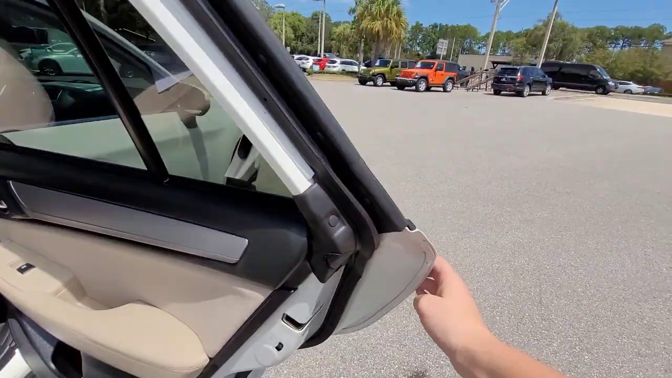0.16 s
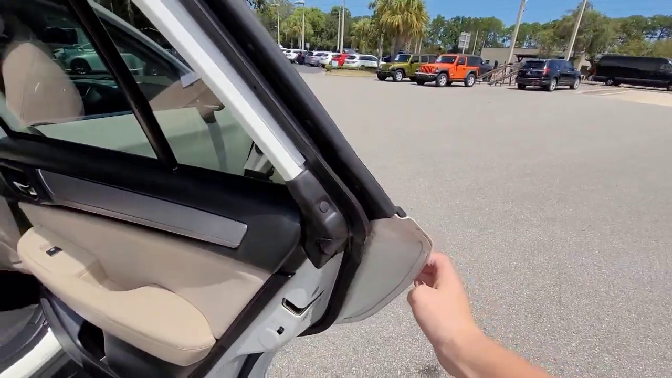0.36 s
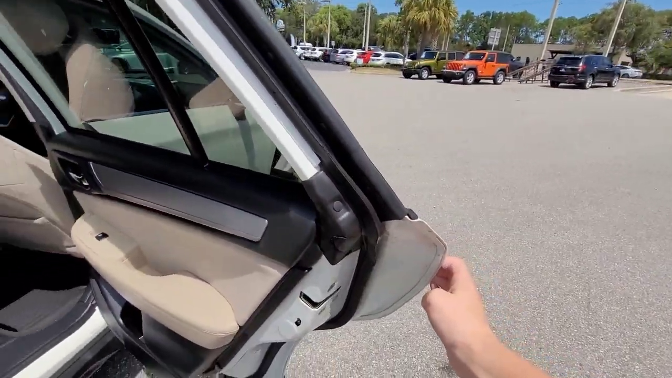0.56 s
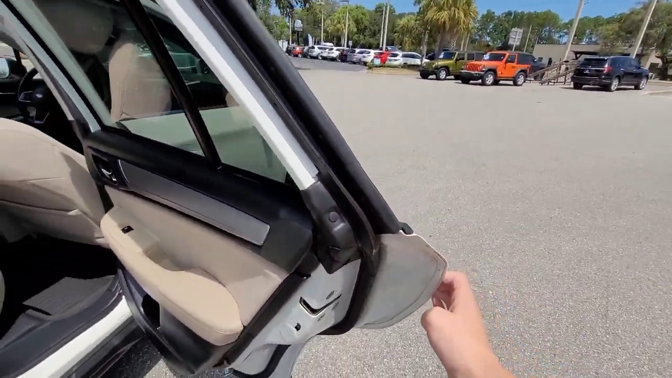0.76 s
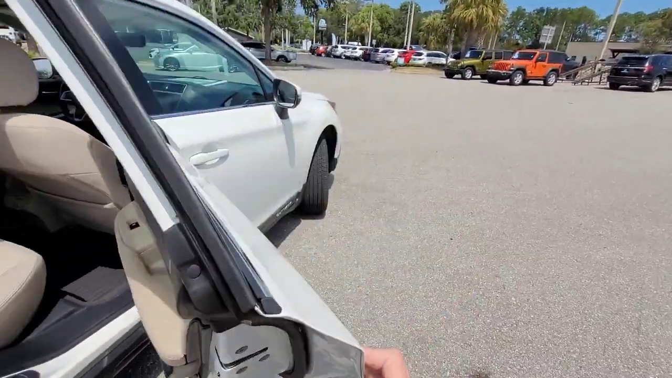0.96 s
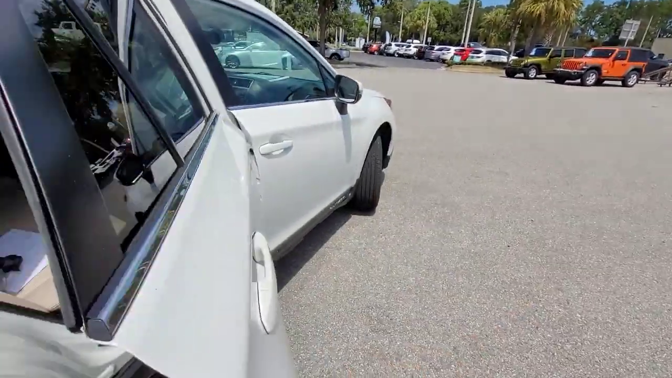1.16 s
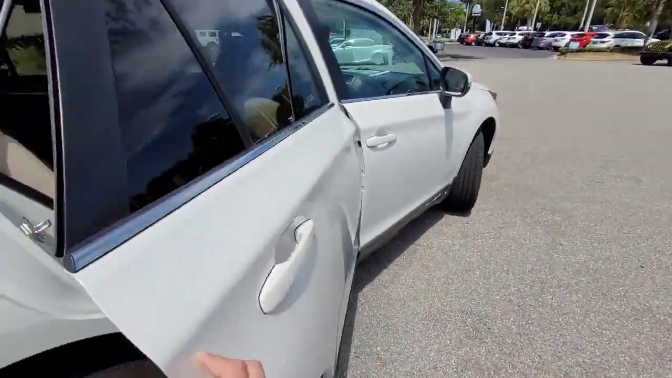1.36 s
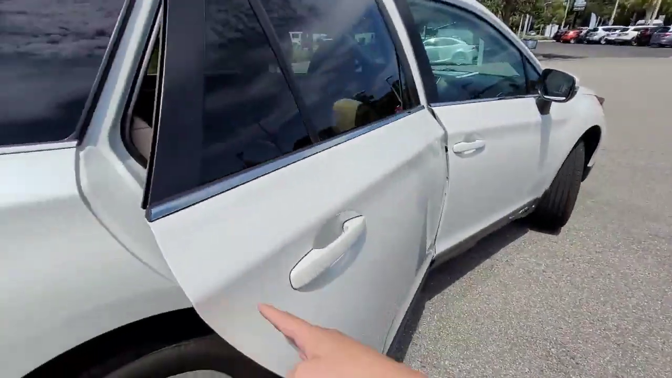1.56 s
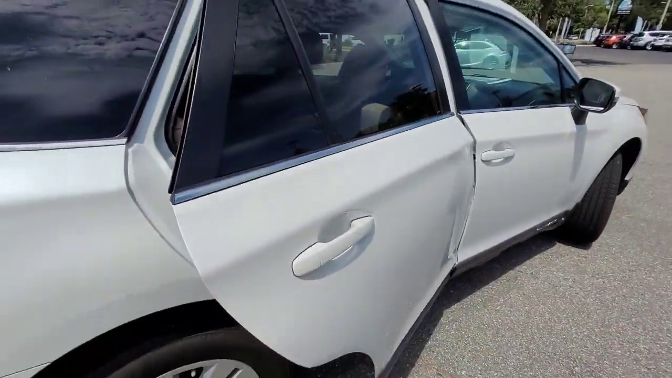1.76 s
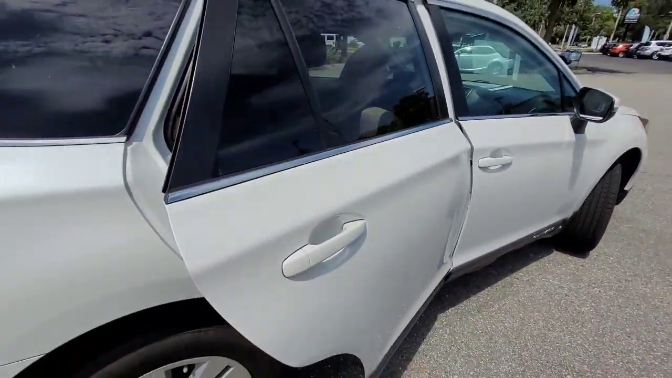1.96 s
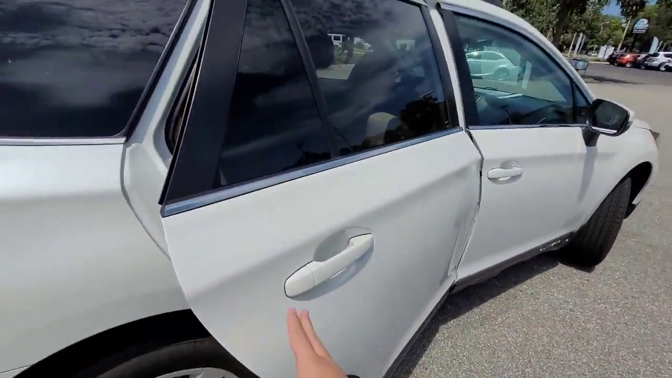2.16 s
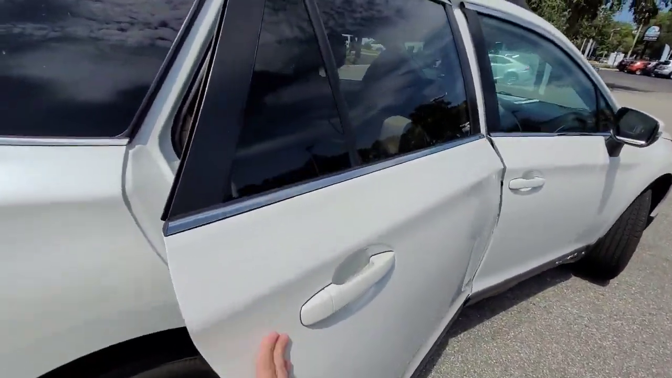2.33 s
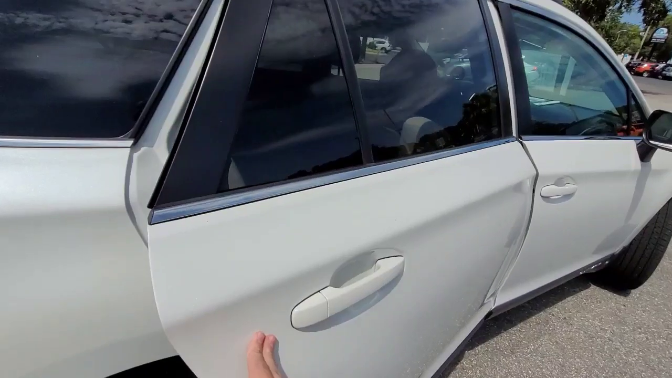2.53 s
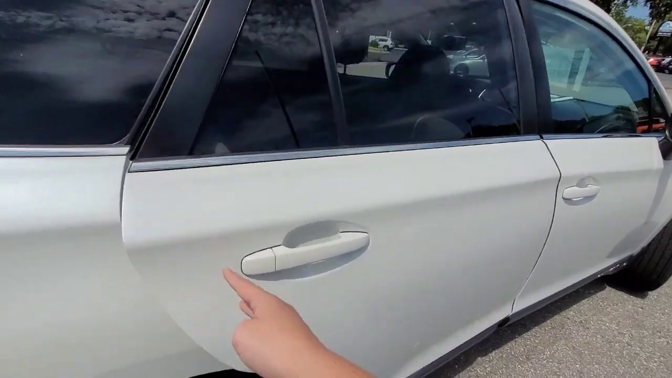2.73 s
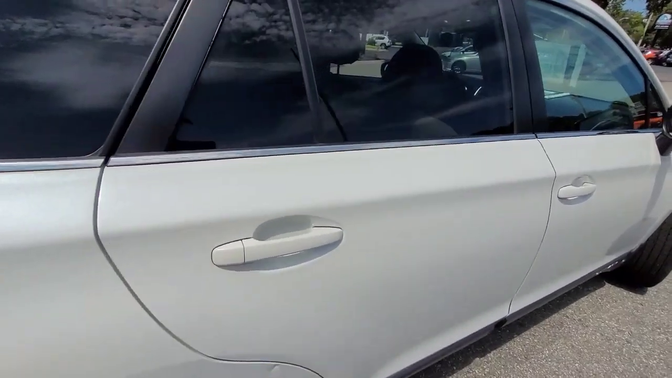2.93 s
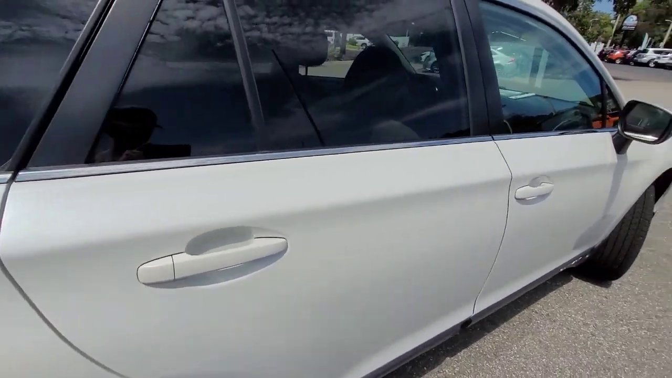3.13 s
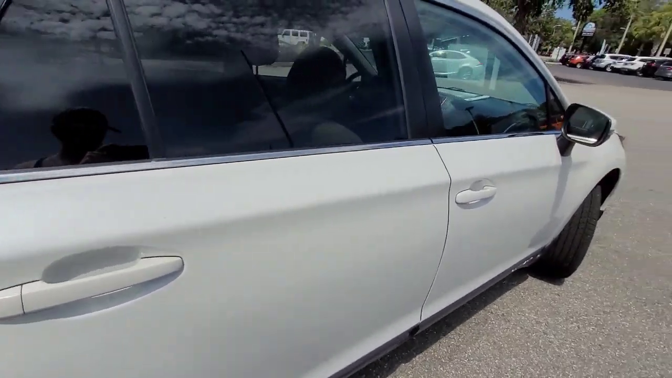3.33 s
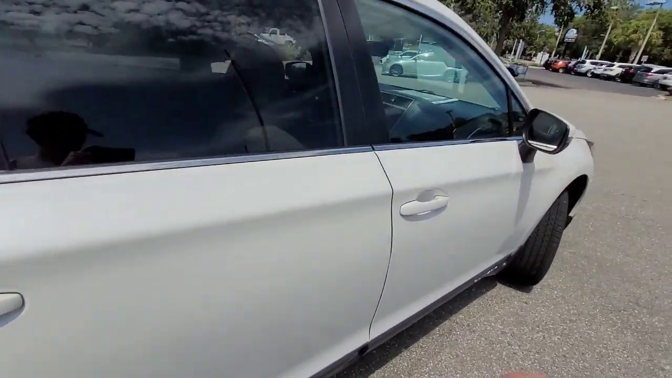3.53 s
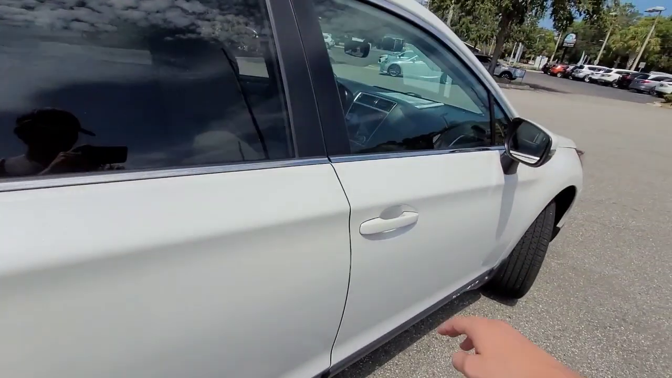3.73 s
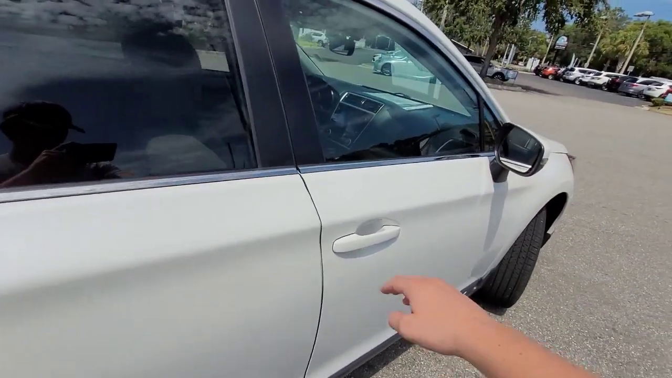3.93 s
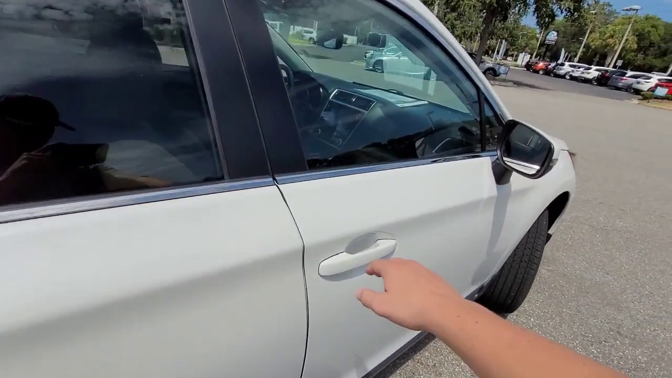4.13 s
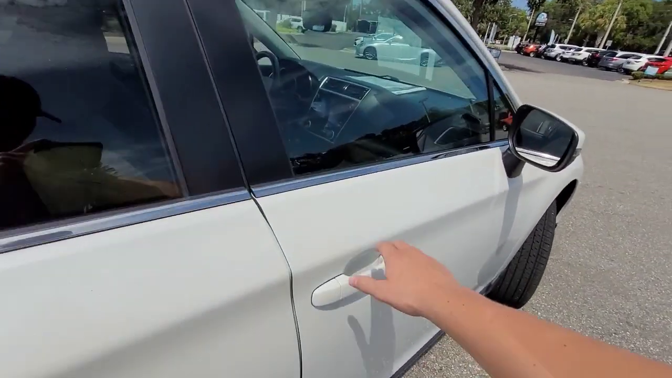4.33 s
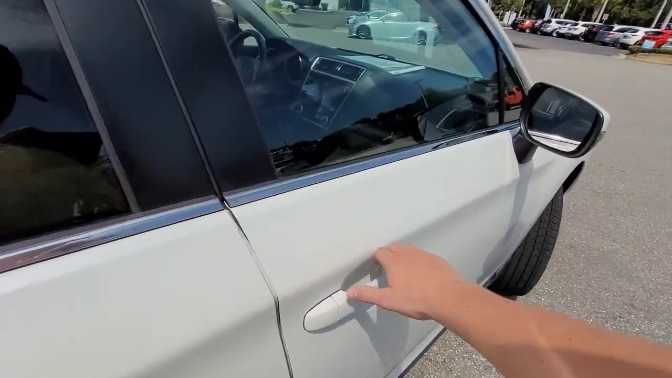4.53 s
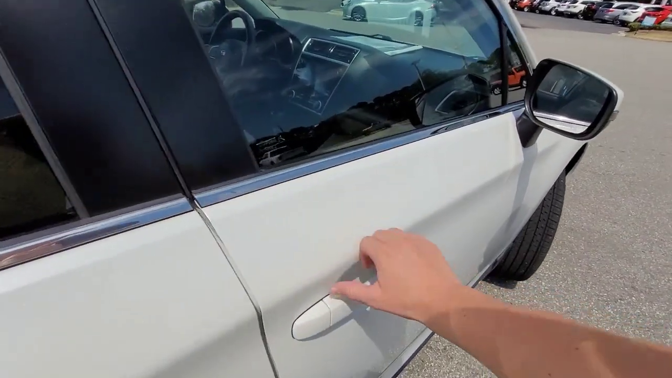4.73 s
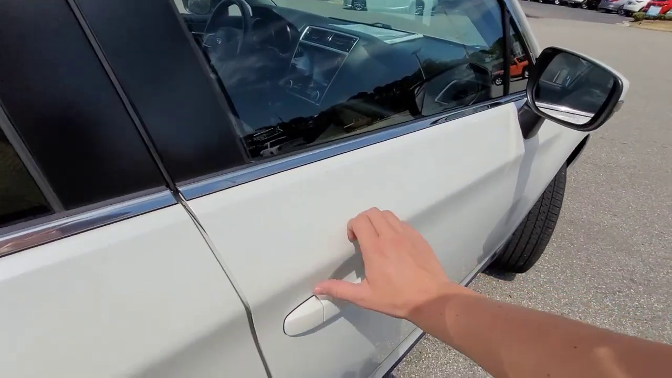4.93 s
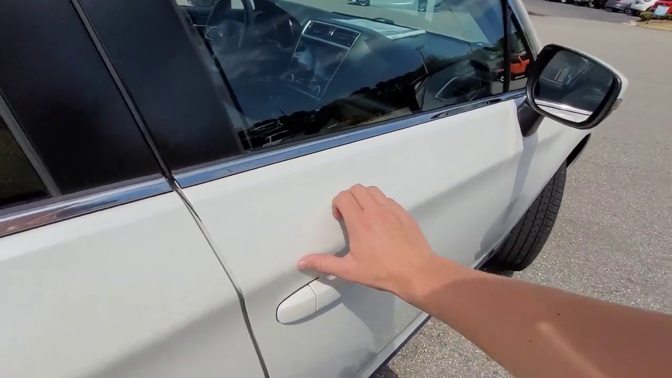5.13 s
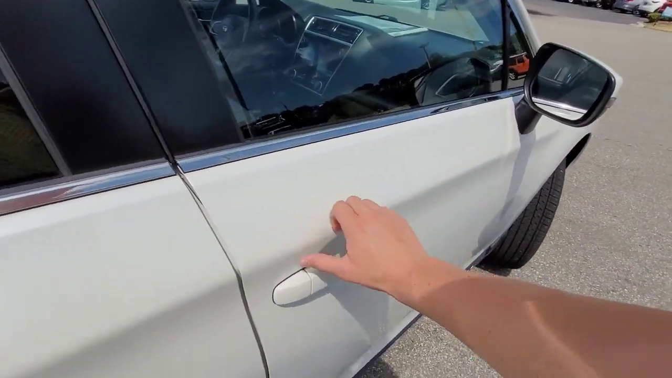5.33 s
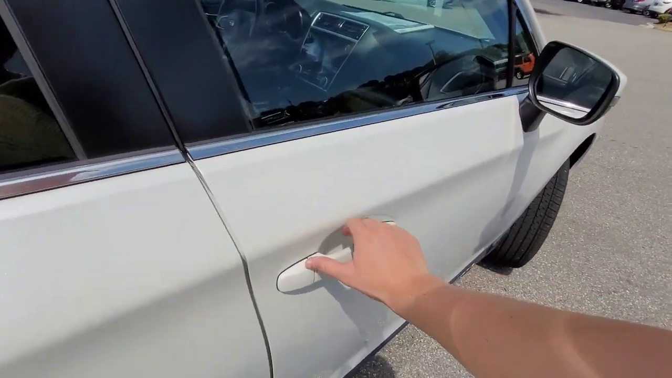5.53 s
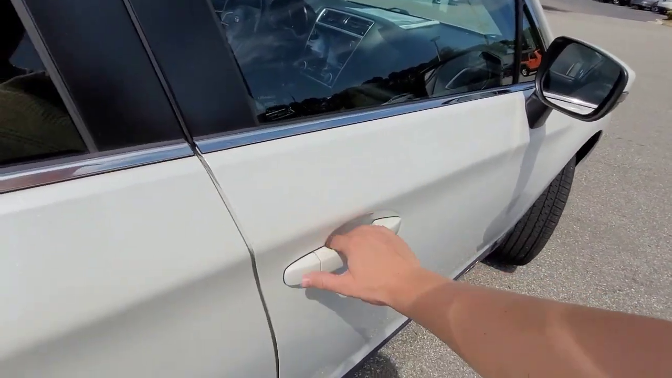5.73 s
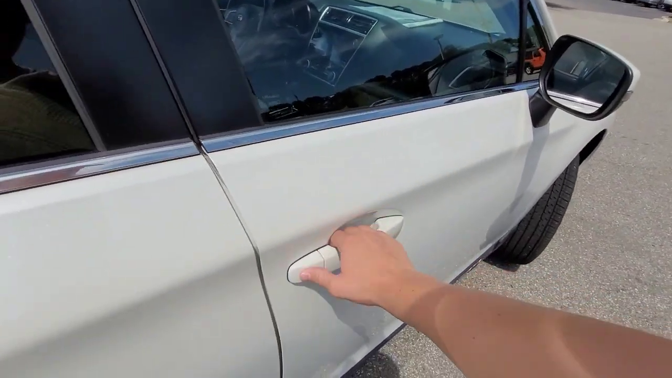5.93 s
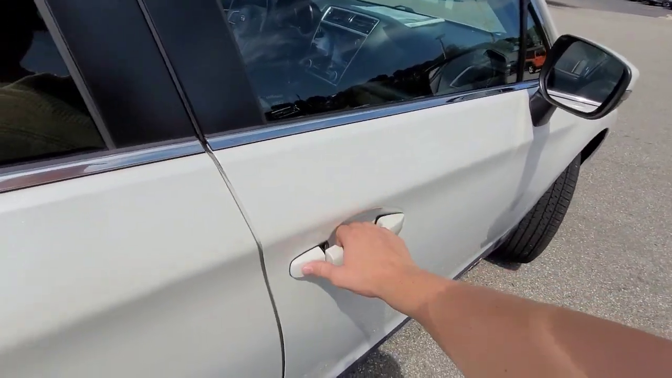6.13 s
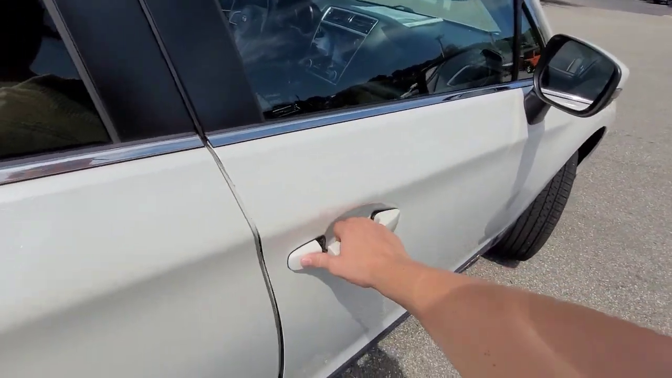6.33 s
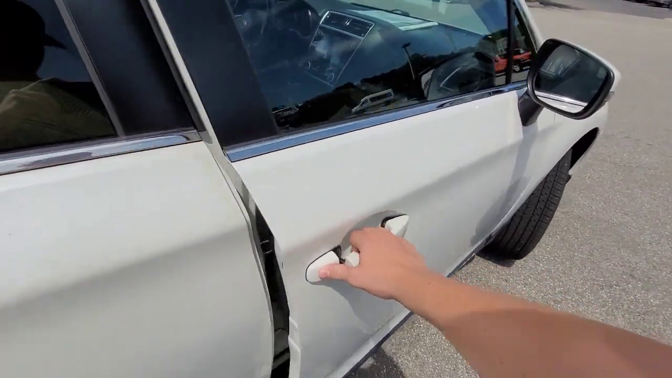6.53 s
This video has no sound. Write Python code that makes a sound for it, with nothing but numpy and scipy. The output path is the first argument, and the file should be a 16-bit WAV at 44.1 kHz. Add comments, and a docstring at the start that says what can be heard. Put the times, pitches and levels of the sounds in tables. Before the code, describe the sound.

Wind buffets the microphone over an idling car; a shoe scuffs, something snaps drily, a car door thuds shut, then another door's latch pops open.

```python
"""Gusts buffet two microphone ports, the left one most, over a car idling on an open lot by a road.
A shoe scuffs, a dry snap follows, and the rear door is pushed shut; after a second scuff
the front door handle is pulled until its latch lets go. Wind, road and hiss are filtered noise,
boom and fan are sines, injector ticks are noise pulses in resonances, doors and snap are
struck decaying modes, and scuffs are grains in resonances."""
import sys
import numpy as np
from scipy import signal
from scipy.fft import rfft, irfft, next_fast_len
from scipy.io import wavfile

SR = 44100
rng = np.random.default_rng(int(sys.argv[2]) if len(sys.argv) > 2 else 0)


def transcribe(signal):
    """Save signal, clipped to [-1, 1], as a 16-bit WAV file at the path in sys.argv[1]."""
    frames = np.atleast_2d(signal).T
    limited = np.clip(frames, -1, 1)
    pcm = np.round(limited * 32767).astype(np.int16)
    wavfile.write(sys.argv[1], SR, pcm)


N = 290178

# Cars passing on the road: closest_s, tyre_roar_db, half_width_s, roar_centre_hz
CAR_PASSES = [(.35, -46.5, 0.15, 714), (1.1, -47.5, 0.46, 860), (1.95, -42.5, 0.4, 760),
              (2.8, -43, 0.11, 760), (4.65, -46.5, 0.23, 800), (5.3, -37.5, 0.41, 737),
              (6.0, -39.5, 0.18, 835), (6.36, -37, 0.37, 670)]
# Spectrum of tyre roar before its moving resonance: frequency_hz, relative_db_per_hz
TYRE_SPECTRUM = [(300, -11), (600, 5.5), (1050, 5.5), (1300, -17), (1600, 0), (2100, -7), (4000, -6)]
DOPPLER_SHARE = .06   # greatest shift either way, as a share of the roar centre
# Distant town rumble: time_s, level_db, tilt_db_per_octave above the knee
RUMBLE_COURSE = [(0.0, -33.5, 1.5), (0.3, -33, 1), (0.9, -34, 2), (1.9, -36.5, 3.5), (2.3, -34.5, 3.5),
                 (2.6, -34, 2), (3.0, -36.5, 2.5), (3.5, -33.5, 1), (3.8, -39.5, 1), (4.12, -38, 2),
                 (4.6, -35.5, 0.5), (5.2, -31, -1.5), (5.7, -33.5, 0), (6.1, -30.5, -2), (6.58, -33, -2)]
# Spectrum of the rumble: frequency_hz, relative_db_per_hz
RUMBLE_SPECTRUM = [(22, -34), (38, 0), (66, -2), (150, -9), (240, -6), (330, -10), (533, -16), (739, -15.5),
                   (1280, -23.5), (1620, -27), (2570, -33.5), (7000, -49), (9100, -83), (15400, -120)]
RUMBLE_KNEE_HZ, ROAD_LAG_S = 1000, .0002
# Correlation of road noise between the ports: frequency_hz, correlation (0 to 1)
PORT_CORRELATION = [(40, 0.97), (300, 0.99), (700, 0.37), (1200, 0.21), (3000, 0.22), (12000, 0.073)]

# Hums of the car, swelling and fading: time_s, exhaust_boom_db, fan_tone_db
HUM_COURSE = [(0.0, -46, -28.5), (0.5, -55, -32.5), (0.9, -38, -32), (1.25, -36, -31.5), (2.1, -32, -30),
              (2.85, -31.5, -31), (3.3, -35, -38.5), (3.75, -43, -35.5), (4.1, -34.5, -33.5),
              (4.65, -34, -30.5), (5.25, -31, -28.5), (5.55, -24, -27.5), (5.9, -28.5, -28.5),
              (6.58, -28, -28)]
# Tones of the fan: multiple of the fan rate, level_db, waver_db
FAN_TONES = [(3, -0.5, 0.84), (4, -4.5, 1)]
BOOM_HZ, BOOM_WIDTH_HZ, FAN_HZ = 56.83, 6.17, 68.47

# Engine bay: time_s, hiss_db, tick_db above the hiss
BAY_COURSE = [(0.0, -58, -10), (0.8, -59, -4), (1.24, -53.5, 0), (1.7, -52, 0.5), (2.33, -51.5, -0.5),
              (3.41, -55.5, -2), (3.6, -59, -3), (4.0, -58.5, -3.5), (5.35, -56, -1), (6.58, -56, -3)]
# Spectrum of belt and intake hiss: frequency_hz, relative_db_per_hz
HISS_SPECTRUM = [(2350, -37), (4000, 1.5), (4500, -5.5), (5800, -7), (7000, 0.5), (7900, 4), (9500, 1),
                 (11000, 1), (12800, 0), (14600, 1), (16000, -5)]
# Idle speed: time_s, engine_cycles_per_s
IDLE_SPEED = [(0, 6.69), (3, 6.70), (6.58, 6.725)]
# Injector ticks in one engine cycle: share of the cycle, level_db
INJECTOR_TICKS = [(0, 0), (.255, 1), (.36, -5), (.61, -1)]
# Resonances of the ticks: centre_hz, width_hz, level_db
TICK_RESONANCES = [(9200, 1200, 2), (11200, 1000, -3), (12200, 1200, 4), (13600, 1400, 0), (15200, 1200, 2)]
CYCLE_START_S = 1.6165
TICK_GAIN_DB = 11   # two narrow filters in a row lose this much

# Lumpy breeze on the ports, rising and falling: time_s, buffet_db before the left-right split
BREEZE_COURSE = [(0, -32.5), (.9, -30.5), (1.2, -35.5), (1.5, -33.5), (2.2, -32.5), (2.9, -29.5),
                 (3.5, -35), (3.7, -36.5), (4.4, -40.5), (5.2, -35.5), (5.7, -44), (6.58, -40)]
# Spectrum of the breeze: frequency_hz, relative_db_per_hz
BREEZE_SPECTRUM = [(21, -28), (36, 0), (59, 1.5), (116, 2.5), (207, -7.5), (279, -6), (562, -29.5),
                   (609, -55), (900, -29), (1170, -24.5), (1980, -120)]
# Short gusts: top_s, level_db before the left-right split, half_width_s
GUST_EVENTS = [(0.0, -30.5, 0.064), (.11, -27, 0.023), (0.156, -23.5, 0.035), (0.251, -20, 0.047),
               (0.329, -23, 0.024), (.45, -30, 0.07), (.57, -33, 0.082), (.9, -33.5, 0.065),
               (2.1, -39.5, 0.064), (2.23, -31.5, 0.054), (2.45, -32, 0.22), (2.65, -26.5, 0.11),
               (3.13, -30.5, 0.03), (3.271, -25, 0.03), (3.399, -25.5, 0.048), (3.48, -26, 0.064),
               (3.8, -34, 0.063), (4.13, -39.5, 0.022), (4.84, -43, 0.04)]
# Spectrum of the gusts: frequency_hz, relative_db_per_hz
GUST_SPECTRUM = [(30, -26), (60, 2.5), (120, 0.5), (230, -3), (330, -8), (520, -22.5), (900, -37),
                 (2000, -90)]
BREEZE_LEFT_DB, GUST_LEFT_DB = 4.5, 12.5   # left minus right

# Shoe drags on asphalt: start_s, length_s, sole_rub_db and grit_db at the end of the drag
SHOE_DRAGS = [(0.152, 0.022, -38, -49), (0.179, 0.024, -38.5, -49), (.205, .028, -36.5, -41.5),
              (4.749, 0.019, -39, -51), (4.771, .013, -38, -46), (4.794, .006, -44, -55)]
# Resonances of the rubber sole: centre_hz, width_hz, level_db
SOLE_MODES = [(800, 300, -1.5), (1310, 220, 1), (1650, 230, 1.5), (2190, 340, -2), (2560, 400, -7),
              (3300, 700, -8.5)]
# Resonances of fine grit: centre_hz, width_hz, level_db
GRIT_MODES = [(3900, 600, -1.5), (4900, 620, 2), (6000, 770, -2), (8000, 2500, -1.5), (11600, 2700, -1),
              (14600, 2000, -1.5)]
SCUFF_ATTACK_S, SCUFF_RELEASE_S = 0.0086, 0.026
SOLE_SWELL_DB, GRIT_SWELL_DB = 2.5, 1.5   # growth along a drag as weight comes onto the foot

# Modes of the snap: frequency_hz, level_db, t60_s, left_minus_right_db
SNAP_MODES = [(725, -6, 0.013, 6), (1270, -6, 0.0047, 2), (1860, 0.5, 0.0067, -5), (2750, 1, 0.0039, -5),
              (4970, -8, 0.0034, -10), (7800, 6.5, 0.0031, 13.5), (9600, -14, .003, -1),
              (10700, 6, 0.0024, -8), (12800, -10, .003, -6), (14900, 6, .0025, -11)]
SNAP_S, SNAP_DB = 1.5469, -24

# Rear door contacts: start_s, panel_db, contact_cutoff_hz, seal_crunch_db, latch_click_db,
# ring share (scales each panel t60), cabin_air_db, push direction (1 or -1)
DOOR_CONTACTS = [(2.89, -26, 900, -22, -85, 0.95, -6, 1), (2.9096, -35, 3000, -22, -52, .5, -10, -1),
                 (2.9146, -12.5, 1600, -25, -55.5, 0.18, -6, -1),
                 (2.9162, -15, 2500, -31, -56, 0.43, -3, 1), (2.9226, -27, 700, -34, -52, 0.46, 0, -1),
                 (2.926, -24, 500, -36, -55.5, 0.41, 2, 1), (2.9301, -19, 350, -40, -62, 0.9, 8, 1),
                 (2.9386, -17.5, 590, -30, -68, 0.38, 5, -1), (2.9560, -12, 200, -37, -77, 0.19, 9.5, 1)]
# Rear door skin and cabin air modes: frequency_hz, level_db, full_t60_s
PANEL_MODES = [(42, -14, 0.22), (77, -2, 0.11), (117, -20, 0.12), (193, -18, 0.12), (265, -31, 0.17),
               (292, -1, 0.27), (333, -1, 0.28), (372, 0.5, 0.18), (447, -4.5, 0.134), (574, -7, 0.06),
               (670, 1.5, 0.11), (760, -3.5, 0.14), (830, 2, 0.11), (880, -2, 0.053), (1180, -12, 0.041),
               (1380, -3, 0.14), (2340, -9, 0.07)]
# Spectrum of the seal crunch: frequency_hz, relative_db_per_hz
CRUNCH_SPECTRUM = [(300, -11), (500, 0.5), (850, 0.5), (1200, -9), (1500, -5.5), (2000, -14), (2800, -17.5),
                   (4300, -29), (7000, -50)]
# Latch and striker metal modes: frequency_hz, level_db, t60_s
LATCH_MODES = [(1520, -2, .02), (2220, 2, .02), (2520, 6, .016), (2800, 8.5, .02), (3230, 5.5, .016),
               (3840, 2.5, 0.014), (4400, 3.5, 0.013), (5000, 1, 0.0072), (5930, 1.5, 0.0059),
               (7500, 3, 0.0073), (8300, 6, 0.0067), (9400, 3, .005), (11000, 0, .004), (13500, -2, .003)]
CABIN_BELOW_HZ = 150   # modes under this move the cabin air
CRUNCH_T60_S, LATCH_T60_S = 0.075, 0.021
LATCH_SPREAD_DB, PANEL_SPREAD_DB = 3, 0.99   # each contact favours other modes

# Handle lever modes: frequency_hz, level_db, t60_s
HANDLE_MODES = [(258, 2, 0.11), (380, 2, .06), (1000, 1, .02), (1900, -9, .008), (2800, -13, .006),
                (4050, -13, 0.014)]
HANDLE_S, HANDLE_DB = 6.038, -40   # the handle lever meets its stop

# Front latch letting go: start_s, panel_db, latch_click_db
RELEASE_CONTACTS = [(6.3988, -9.5, -54), (6.4070, -13, -42), (6.44, -23, -51), (6.4973, -29, -44.5)]
# Front door panel modes: frequency_hz, level_db, t60_s
FRONT_PANEL_MODES = [(155, -24, .06), (224, 3, 0.027), (313, 8, 0.026), (358, 2.5, 0.033), (428, -29, .03)]
# Spectrum of the front latch clicks: frequency_hz, relative_db_per_hz
FRONT_LATCH_SPECTRUM = [(1500, 0.5), (2500, 7), (4000, -8), (5800, 0), (8000, -10), (14000, -18)]

LOWPASS_HZ = 15870


def from_db(db):
    """Amplitude ratio: 20 dB is a factor of ten."""
    return 10 ** (np.asarray(db) / 20)


def rms_one(x):
    """Normalisation: scale to unit root-mean-square."""
    return x / np.sqrt(np.mean(x ** 2) + 1e-20)


def in_time(rows):
    """Linear interpolation: each column after the time gets one value a sample."""
    s, *columns = np.transpose(rows)
    return [np.interp(np.arange(N) / SR, s, c) for c in columns]


def at_hz(points, hz):
    """Spectral interpolation on a log-frequency axis."""
    known_hz, values = np.array(points).T
    return np.interp(np.log(hz), np.log(known_hz), values)


def sides(pan_db):
    """Interaural level difference, split evenly into left and right gains."""
    return from_db([pan_db / 2, -pan_db / 2])


def drift(corner_hz):
    """Random modulation: noise through two equal low-pass poles, scaled to unit rms."""
    r = np.exp(-80 * np.pi * corner_hz / SR)   # computed at every 40th sample
    noise = rng.standard_normal(N // 40 + 2002)
    slow = signal.lfilter([1], [1, -2 * r, r * r], noise)[2000:]
    return np.interp(np.arange(N) / 40, np.arange(len(slow)), rms_one(slow))


def bump(s, half_s):
    """Squared Lorentzian swell: 1 at the top, a quarter at half_s away."""
    return 1 / (1 + ((np.arange(N) / SR - s) / half_s) ** 2) ** 2


def dying(size, level_db, t60, rise_s):
    """Exponential decay with a short exponential onset."""
    t = np.arange(size) / SR
    return from_db(level_db - 60 * t / t60) * (1 - np.exp(-t / rise_s))


def ring(clicks, hz, t60):
    """Modal decay: a unit click sets a damped sine of height 1 ringing."""
    r, w = from_db(-60 / (t60 * SR)), 2 * np.pi * hz / SR
    return signal.lfilter([0, np.sin(w)], [1, -2 * r * np.cos(w), r * r], clicks + 1e-18)


def resonate(x, hz, width_hz):
    """Driven resonance: a two-pole band-pass of unit gain on top."""
    r = np.exp(-np.pi * width_hz / SR)
    poles = [1, -2 * r * np.cos(2 * np.pi * hz / SR), r * r]
    return signal.lfilter(np.array([1, 0, -1]) * (1 - r * r) / 2, poles, x)


def swept(x, hz, width_hz, size=256):
    """Moving resonance: the poles are retuned block by block; the result has unit rms."""
    out, state, r = np.zeros_like(x), np.zeros((2, 2)), np.exp(-np.pi * width_hz / SR)
    for i in range(0, N, size):
        poles = [1, -2 * r * np.cos(2 * np.pi * hz[i] / SR), r * r]
        out[:, i:i + size], state = signal.lfilter([1, 0, -1], poles, x[:, i:i + size], zi=state)
    return rms_one(out)


def coloured(spectrum, correlation):
    """Partly coherent noise: mid and side mixed for the port correlation, at unit rms."""
    size = next_fast_len(N)
    hz = np.maximum(np.arange(size // 2 + 1) * SR / size, 1)
    gain = from_db(at_hz(spectrum, hz)) * (hz > spectrum[0][0] / 2)
    mid, side = rfft(rng.standard_normal((2, size)))
    if not np.isscalar(correlation):
        correlation = at_hz(correlation, hz)
    alike = np.clip(correlation, 0, 1)
    both = gain * (np.sqrt(1 + alike) * mid + np.sqrt(1 - alike) * side * [[1], [-1]])
    return rms_one(irfft(both, size)[:, :N])


def tilted(x, knee_hz, tilt_db, patchy_db):
    """Spectral tilt: octave bands above the knee follow it, and each band flickers by itself."""
    out, rest = 0, x
    for k in range(-3, 4):
        lowpass = signal.butter(1, knee_hz * 2. ** k, fs=SR, output="sos")
        band = signal.sosfiltfilt(lowpass, rest)
        out = out + band * from_db(max(k, 0) * tilt_db + patchy_db * drift(9.6))
        rest = rest - band
    return out + rest * from_db(0.45 * tilt_db)   # the remaining treble tilts less, without flicker


def late_left(x, lag_s):
    """Interaural delay: a source off to the right reaches the left port later."""
    n = np.arange(N)
    return np.array([np.interp(n - lag_s * SR, n, x[0]), x[1]])


def wind():
    """Turbulent pressure, almost uncorrelated at the ports: a breeze with short gusts on top."""
    breeze_db = in_time(BREEZE_COURSE)[0] + [2.95 * drift(15.5), 4.2 * drift(10.4)]
    breeze = from_db(breeze_db) * sides(BREEZE_LEFT_DB)[:, None]
    swells = sum(from_db(db) * bump(s, half_s) for s, db, half_s in GUST_EVENTS)
    flutter = from_db(0.99 * drift(29.0))   # faster than the lumps of the breeze
    gusts = swells * flutter * sides(GUST_LEFT_DB)[:, None]
    return breeze * coloured(BREEZE_SPECTRUM, .05) + gusts * coloured(GUST_SPECTRUM, 0.05)


def road():
    """Broadband rumble, and tyre roar with Doppler shift and ground reflection as cars pass."""
    rumble_db, tilt_db = in_time(RUMBLE_COURSE)
    rumble = coloured(RUMBLE_SPECTRUM, PORT_CORRELATION)
    rumble = tilted(rumble, RUMBLE_KNEE_HZ, tilt_db, patchy_db=2.5)
    n, power, weighted_hz = np.arange(N), 0, 0
    for s, level_db, half_s, centre_hz in CAR_PASSES:
        near = from_db(2 * level_db) * bump(s, half_s)   # power of this car
        doppler = 1 - DOPPLER_SHARE * np.tanh((n / SR - s) / half_s)
        power = power + near
        weighted_hz = weighted_hz + near * centre_hz * doppler
    tyre_hz = weighted_hz / power   # the louder cars set the shared roar centre
    direct = swept(coloured(TYRE_SPECTRUM, PORT_CORRELATION), tyre_hz, 530.0)
    # the bounce off the asphalt comes one period late: ridges on multiples of the centre, dips between
    bounce = np.array([np.interp(n - SR / tyre_hz, n, side) for side in direct])
    tyres = rms_one(direct + 0.3 * bounce) * from_db(1.66 * drift(16.0))
    return late_left(from_db(rumble_db) * rumble + np.sqrt(power) * tyres, ROAD_LAG_S)


def hum():
    """Periodic radiation: a frequency-modulated exhaust boom and two wavering fan harmonics."""
    boom_db, fan_db = in_time(HUM_COURSE)
    t = np.arange(N) / SR
    boom_hz = BOOM_HZ + BOOM_WIDTH_HZ / 2 * drift(3.56)
    boom = np.sin(2 * np.pi * np.cumsum(boom_hz) / SR) * from_db(1.2 * drift(1.4))
    fan = 0
    for multiple, level_db, waver_db in FAN_TONES:
        fan_phase = 2 * np.pi * FAN_HZ * t + 0.098 * drift(3.9)
        fan = fan + np.sin(multiple * fan_phase) * from_db(level_db + waver_db * drift(3.6))
    mono = from_db(boom_db) * boom + from_db(fan_db) * fan
    return late_left(np.array([mono, mono]), ROAD_LAG_S)


def engine_bay():
    """Cyclic excitation: injector ticks drive resonances over belt and intake hiss."""
    hiss_db, tick_db = in_time(BAY_COURSE)
    cycles = np.cumsum(in_time(IDLE_SPEED)[0]) / SR
    cycles -= cycles[int(CYCLE_START_S * SR)]
    rise, fall = np.exp(-1 / (0.0019 * SR)), np.exp(-1 / (0.0095 * SR))   # time constants in s
    noise, ticks = rng.standard_normal((2, N)), 0
    for hz, width_hz, mode_db in TICK_RESONANCES:   # every tick drives each one with its own strength
        pulses = np.zeros(N)
        for share, level_db in INJECTOR_TICKS:
            at = np.flatnonzero(np.diff(np.floor(cycles - share)))
            strength_db = rng.normal(0, 3.0, 60)[:len(at)]
            pulses[at] = from_db(level_db + mode_db + strength_db)
        shape = signal.lfilter([1 - rise], np.convolve([1, -rise], [1, -fall]), pulses)
        ticks = ticks + resonate(resonate(shape * noise, hz, width_hz), hz, 2 * width_hz)
    hiss = coloured(HISS_SPECTRUM, 0.021) * from_db(1.35 * drift(4.7))
    return from_db(hiss_db) * (hiss + from_db(tick_db + TICK_GAIN_DB) * ticks)


def cracked(modes, per_s):
    """Granular excitation: each resonance has its own grains, so the colour jumps."""
    out = 0
    for hz, width_hz, level_db in modes:
        grain_db = 2.9 * np.minimum(rng.exponential(1, N), 3)
        grains = (rng.random(N) < per_s / SR) * from_db(grain_db)
        noise = rng.standard_normal(N) + 1.3 * rng.standard_normal((2, N))   # shared part, own parts
        crunch = (grains + 0.31) * noise
        body = resonate(resonate(crunch, hz, width_hz), hz, 2 * width_hz)
        out = out + from_db(level_db) * rms_one(body)
    return rms_one(out)


def scuffs():
    """Sliding friction: grit cracks and the sole resonates; each drag grows, then fades quickly."""
    t, out = np.arange(N) / SR, np.zeros((2, N))
    sole, grit = cracked(SOLE_MODES, per_s=240.0), cracked(GRIT_MODES, per_s=690.0)
    for s, length_s, sole_db, grit_db in SHOE_DRAGS:
        to_go = np.clip(1 - (t - s) / length_s, 0, 1)
        attack = np.clip((t - s) / SCUFF_ATTACK_S, 0, 1)
        touch = attack * np.clip(1 - (t - s - length_s) / SCUFF_RELEASE_S, 0, 1) ** 2
        out += touch * from_db(sole_db - SOLE_SWELL_DB * to_go) * sole
        out += touch * from_db(grit_db - GRIT_SWELL_DB * to_go) * grit
    return out


def snap():
    """Impulse response: a split click, under a millisecond long, excites short stiff modes."""
    clicks = np.zeros(N)
    clicks[int(SNAP_S * SR) + np.array([0, 16])] = from_db(SNAP_DB) * np.array([.5, 1])
    rings = 0
    for hz, level_db, t60, pan_db in SNAP_MODES:
        rings = rings + from_db(level_db) * sides(pan_db)[:, None] * ring(clicks, hz, t60)
    return late_left(rings, .00007)


def soft_push(size, level_db, cut_hz):
    """Compliant contact: a rubber pad low-passes the click of a blow."""
    pad = np.exp(-2 * np.pi * cut_hz / SR)
    click = np.arange(size) == 0
    return signal.lfilter([from_db(level_db) * (1 - pad) ** 2], [1, -2 * pad, pad * pad], click)


def latch(size, level_db, colour_db):
    """Metal contact: a short noise rattle, weakly correlated at the ports, excites latch modes."""
    noise = .5 * rng.standard_normal(size) + rng.standard_normal((2, size))
    rattle = dying(size, level_db, LATCH_T60_S, 0.00042) * noise
    out = 0
    for (hz, mode_db, t60), extra_db in zip(LATCH_MODES, colour_db):
        out = out + from_db(mode_db + extra_db) * ring(rattle, hz, t60)
    return out


def rear_door():
    """Modal impact: each contact pushes panel modes, crunches the seals and clicks the latch."""
    out, size = np.zeros((2, N)), int(.4 * SR)
    crunch = coloured(CRUNCH_SPECTRUM, 0.23) * from_db(2.3 * drift(200.0))
    latch_spread = rng.normal(0, LATCH_SPREAD_DB, (len(DOOR_CONTACTS), len(LATCH_MODES)))
    panel_spread = rng.normal(0, PANEL_SPREAD_DB, (len(DOOR_CONTACTS), len(PANEL_MODES)))
    for contact, colour_db, metal_db in zip(DOOR_CONTACTS, panel_spread, latch_spread):
        s, panel_db, cut_hz, crunch_db, click_db, ring_share, cabin_db, direction = contact
        span = slice(int(s * SR), int(s * SR) + size)
        push = direction * soft_push(size, panel_db, cut_hz)
        for (hz, level_db, t60), extra_db in zip(PANEL_MODES, colour_db):
            gain = from_db(level_db + extra_db + cabin_db * (hz < CABIN_BELOW_HZ))
            out[:, span] += gain * ring(push, hz, t60 * ring_share)
        out[:, span] += dying(size, crunch_db, CRUNCH_T60_S, 0.0013) * crunch[:, span]
        out[:, span] += latch(size, click_db, metal_db)
    return late_left(out[::-1], 0.00018)[::-1]   # sides swapped and back: the right port is late


def handle():
    """Smeared impact: a noise burst of a few milliseconds excites small plastic modes."""
    contact, size = np.zeros(N), int(0.024 * SR)
    burst = dying(size, HANDLE_DB, 0.022, 0.0025) * rng.standard_normal(size)
    contact[int(HANDLE_S * SR):][:size] = burst
    return sum(from_db(db) * ring(contact, hz, t60) for hz, db, t60 in HANDLE_MODES)


def front_latch_release():
    """Sudden release: the front latch springs open with compact modal knocks and noise clicks."""
    out, size = np.zeros((2, N)), int(.075 * SR)
    click = coloured(FRONT_LATCH_SPECTRUM, .4)
    highpass = signal.butter(3, 175, "high", fs=SR, output="sos")
    for s, panel_db, click_db in RELEASE_CONTACTS:
        span = slice(int(s * SR), int(s * SR) + size)
        push = soft_push(size, panel_db, 280.0)
        knock = sum(from_db(db) * ring(push, hz, t60) for hz, db, t60 in FRONT_PANEL_MODES)
        out[:, span] += signal.sosfilt(highpass, knock)
        out[:, span] += dying(size, click_db, 0.051, .001) * click[:, span]
    return out


def scene():
    """Superposition: the pressures of all sources add at the two ports."""
    continuous = wind() + road() + hum() + engine_bay()
    return continuous + scuffs() + snap() + rear_door() + handle() + front_latch_release()


def record(dry):
    """Band limiting and saturation: sub-bass is cut, peaks clip, then the top is cut."""
    highpass = signal.butter(1, 18, "high", fs=SR, output="sos")
    lowpass = signal.ellip(10, .5, 45, LOWPASS_HZ, fs=SR, output="sos")
    clipped = np.clip(signal.sosfilt(highpass, dry), -1, 1)
    return signal.sosfilt(lowpass, clipped)


dry = scene()
out = record(dry)
transcribe(out)
```